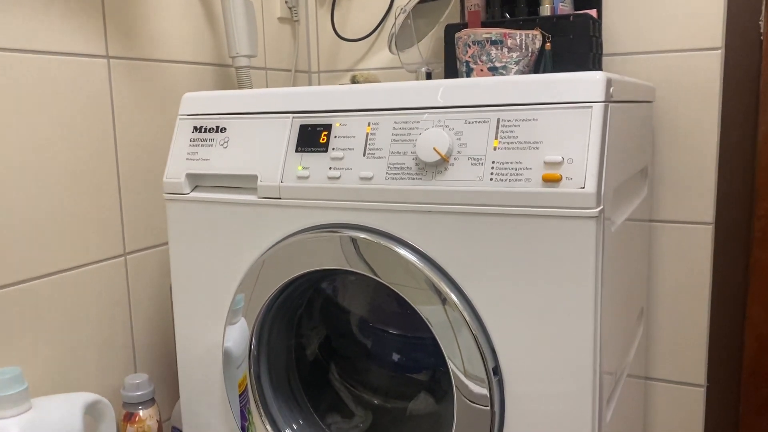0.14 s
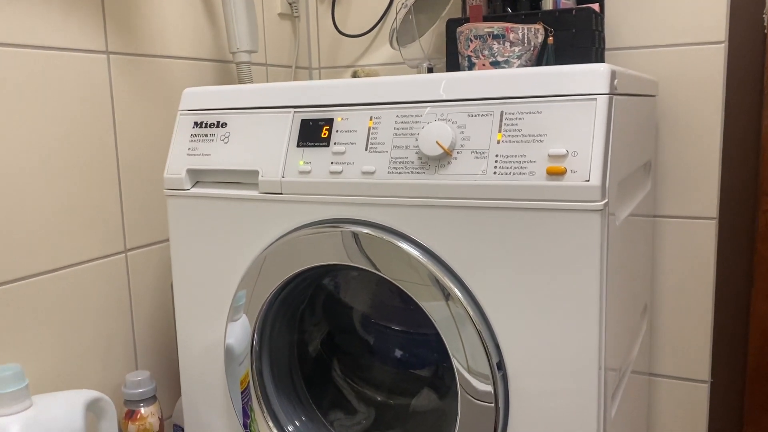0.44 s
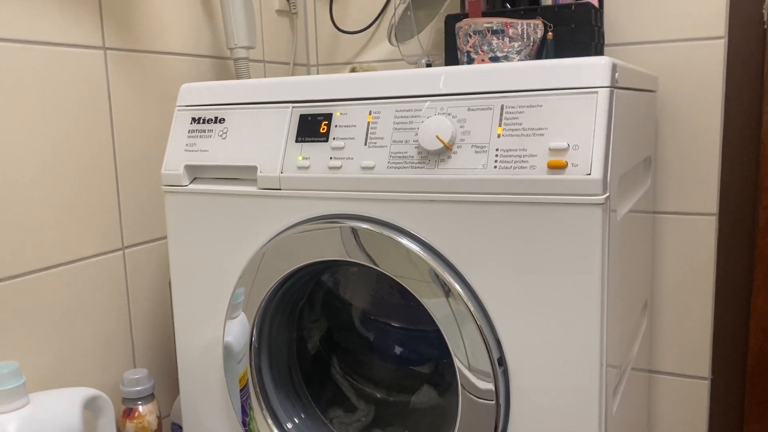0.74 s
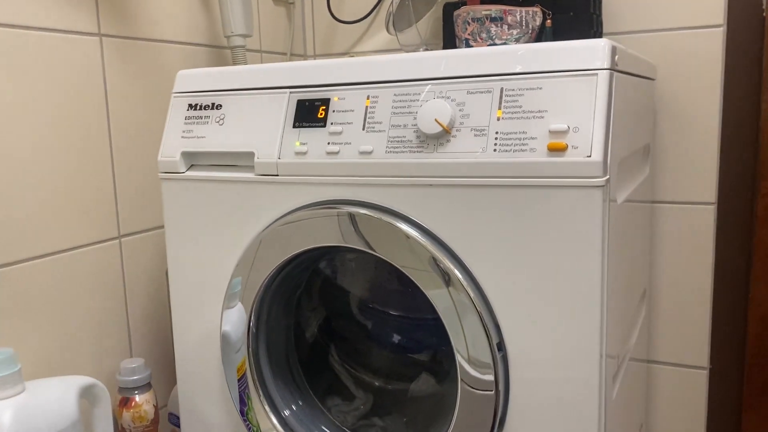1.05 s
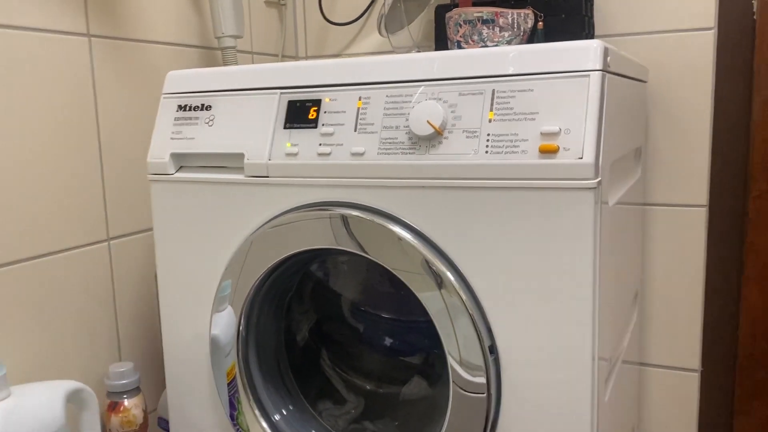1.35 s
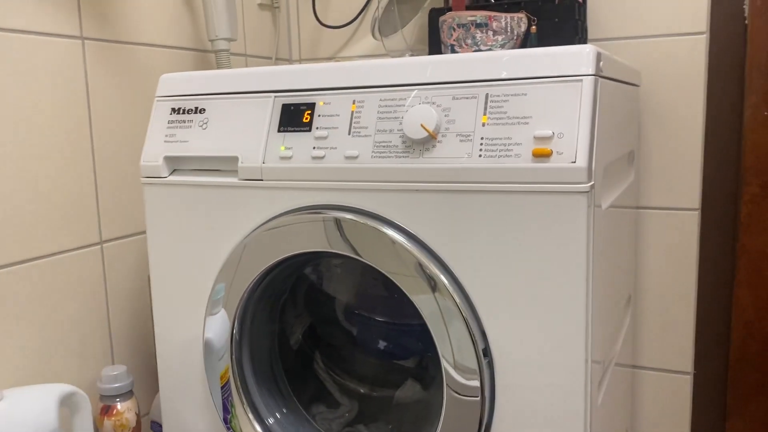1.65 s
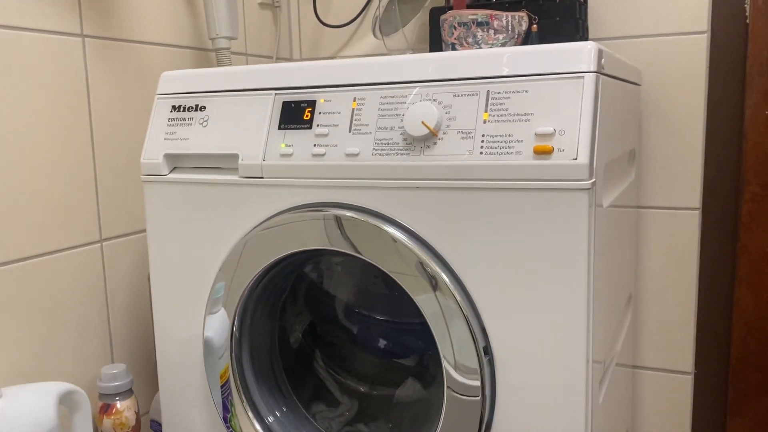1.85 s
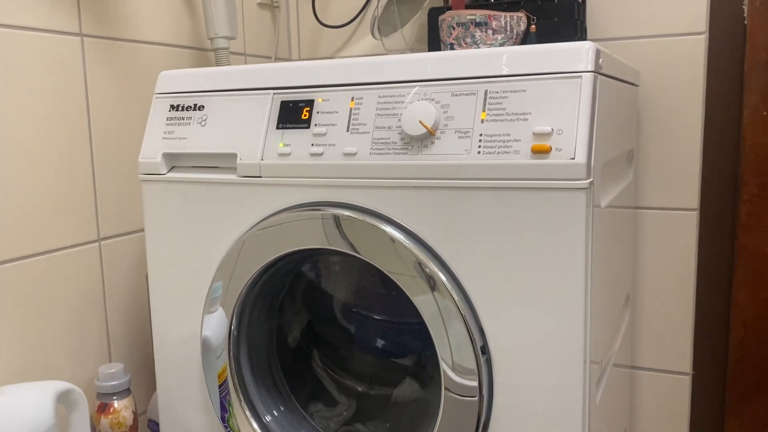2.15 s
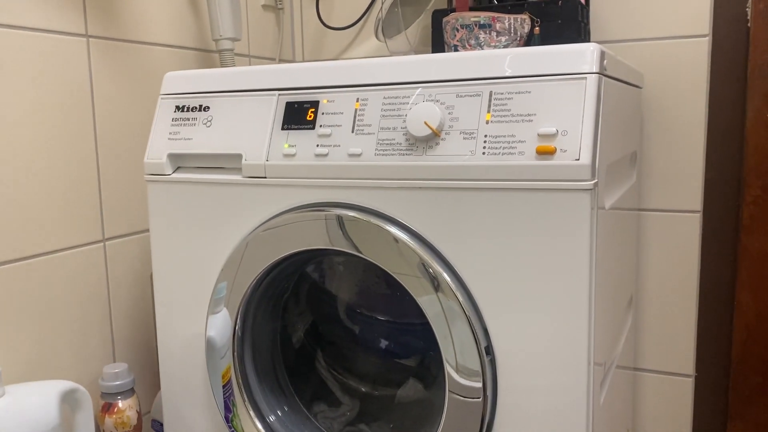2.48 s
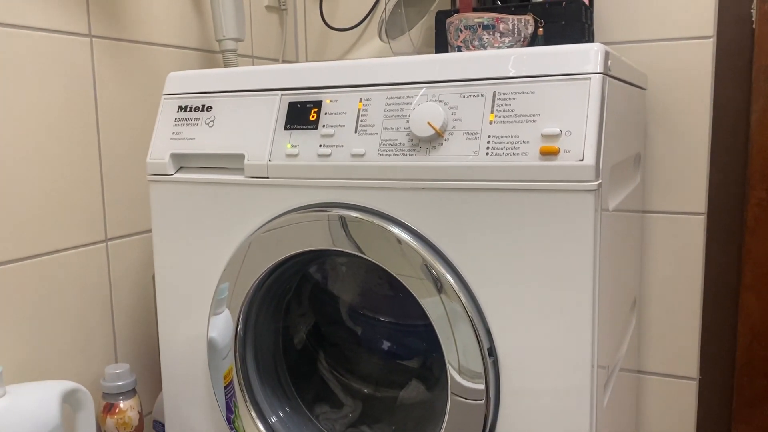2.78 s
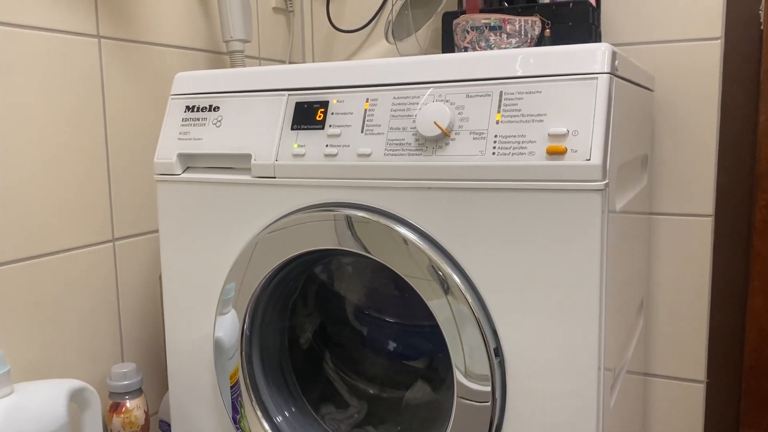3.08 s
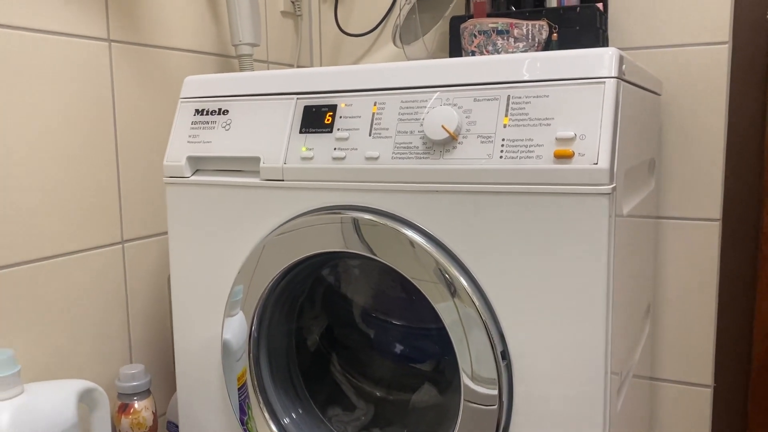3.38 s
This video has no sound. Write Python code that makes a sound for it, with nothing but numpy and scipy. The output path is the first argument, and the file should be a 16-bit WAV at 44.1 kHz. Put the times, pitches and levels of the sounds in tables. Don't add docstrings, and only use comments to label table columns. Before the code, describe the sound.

Washing machine drum turning with low thuds and watery surges, then a fuller humming roar

```python
import sys
import numpy as np
from scipy import signal
from scipy.fft import rfft, irfft
from scipy.io import wavfile
from scipy.ndimage import uniform_filter1d

SR = 44100
rng = np.random.default_rng(int(sys.argv[2]) if len(sys.argv) > 2 else 0)


def boost_factor(decibels):
    exponent = np.asarray(decibels, float) / 20
    return 10 ** exponent


def to_wav(s):
    ch = np.atleast_2d(s).T
    pcm = np.round(np.clip(ch, -1, 1) * 32767)
    wavfile.write(sys.argv[1], SR, pcm.astype(np.int16))


N = 155232
FRAME = 4096
ROAR_START_S, ROAR_RISE_S = 1.815, 0.23
ROOM = rng.standard_normal((2, 2200))


def evened(x):
    return x / np.sqrt(np.mean(abs(x) ** 2) + 1e-30)


def read(points, hz):
    f, value = np.transpose(points)
    return np.interp(np.log(hz + 1), np.log(f + 1), value)


def drift(t, top_hz):
    rates = np.geomspace(1.5, top_hz, num=16)
    return evened(sum(np.sin(2 * np.pi * (f * t + rng.random())) / np.sqrt(f) for f in rates))


def bins_and_times():
    return np.fft.rfftfreq(FRAME, 1 / SR)[:, None], np.arange(4 * N // FRAME + 5) * FRAME / 4 / SR


def sway_db(hz, t):
    # time in seconds, drift towards the wall from 0 to 1.
    sway = [
        (0, .15),
        (.55, .45),
        (1.05, .6),
        (1.4, .95),
        (2.25, .95),
        (2.6, .4),
        (2.9, .1),
        (3.52, 0),
    ]
    # frequency in Hz, left port change in dB at full drift.
    sway_left = [(60, -2), (100, -3.6), (200, -5.5), (350, -2.2), (1500, -1.5), (6000, -1.2)]
    resting_place = .55
    return read(sway_left, hz) * (np.interp(t, *np.transpose(sway)) - resting_place)


def pump(t):
    # time in seconds, rocking of the cabinet in dB, magnetic load in dB.
    states = [(0.0, -46.5, -55), (0.06, -46, -59), (0.148, -48, -63.5), (0.24, -49.5, -57),
              (0.681, -45, -65), (0.89, -44, -50), (1.25, -45, -60), (1.32, -48.5, -59.5),
              (1.55, -54, -57.5), (1.81, -44, -64), (1.989, -48, -41), (2.349, -46, -39),
              (2.67, -55.5, -42), (2.739, -51, -42), (3.1, -52.5, -40), (3.16, -63.5, -42),
              (3.401, -50, -42.5), (3.52, -53.5, -43.5)]
    # time in seconds, onset in seconds, recovery in seconds, change of rocking in dB.
    lurches = [(0.439, .03, 0.026, 3.5), (0.536, .015, 0.05, -3.5), (1.041, .03, 0.066, -3),
               (1.291, .003, 0.017, -5.5), (1.83, 0.013, .015, 3), (1.861, 0.01, 0.012, -6),
               (2.2, 0.02, 0.023, -2), (2.318, 0.042, .03, 4.5), (2.86, 0.033, .04, 5.5),
               (2.98, .02, 0.036, -8), (3.07, 0.036, 0.013, 4.5)]
    s, rock_db, load_db = np.transpose(states)
    rock_db = np.interp(t, s, rock_db)
    for at, onset, recovery, db in lurches:
        rock_db = rock_db + db * np.exp(-((t - at) / np.where(t < at, onset, recovery)) ** 2)
    return rock_db, np.interp(t, s, load_db)


def noise(gain, patchy_db):
    # resonance in Hz, lift in dB.
    panels = [(128, 5), (152, 6), (302, 8), (426, 6), (540, 3), (669, 10), (815, 15), (953, 16),
              (1057, 11.5), (1309, 14), (1604, 8), (1818, 7), (2358, 8), (3075, 6), (3170, 8), (3365, 4),
              (3620, 4), (4284, 6), (4375, 6), (4535, 5)]
    # frequency in Hz, likeness of the two ports from 0 to 1.
    likeness = [(40, .88), (100, .98), (230, .95), (400, .68), (750, .9), (1500, .55), (3500, .5),
                (6800, .65)]
    # frequency in Hz, phase lead of the left port in rad.
    left_lead = [(60, -1.2), (390, -1.5), (700, -5.1), (880, -7.1), (1400, -8.3), (2000, -12.3),
                 (3300, -13.2), (4200, -12.3)]
    # frequency in Hz, left minus right level in dB.
    tilt = [(40, -.8), (100, -1.7), (200, -3.5), (550, -5.5), (1700, -5.8), (4000, -4.2), (9000, -5)]
    port_delay_s, room_ripple_db = .000435, 2.3
    panel_hz_wide, panel_q = 6, 300

    hz, t = bins_and_times()
    f = hz[:, 0]
    a, b, c, d, patches = rng.standard_normal((gain.shape[1], len(f), 5)).T
    patches = uniform_filter1d(patches, size=FRAME // 100, axis=0)
    patches = evened(uniform_filter1d(patches, size=6, axis=1))

    ring = 1
    for panel_hz, db in panels:
        width = panel_hz_wide + panel_hz / panel_q
        ring = ring + (boost_factor(db) - 1) / (1 + (2 * (f - panel_hz) / width) ** 2)
    ripple = np.array([boost_factor(room_ripple_db * np.interp(f / 10, np.arange(len(port)), port) * (f > 250))
                       for port in ROOM])

    same = np.clip(read(likeness, hz), 0, 1)
    right = a + 1j * b
    left = same * right + np.sqrt(1 - same ** 2) * (c + 1j * d)
    lead_rad = read(left_lead, hz) + 2 * np.pi * hz * port_delay_s
    left = left * np.exp(1j * lead_rad) * boost_factor(read(tilt, hz) + sway_db(hz, t))
    z = np.array([left, right]) * gain * (ring * ripple)[:, :, None] * boost_factor(patchy_db * patches)
    return signal.istft(z, nperseg=FRAME, noverlap=FRAME * 3 // 4)[1][:, :N]


def rumble():
    # frequency in Hz, spectrum in dB per Hz.
    tub = [(25, -25), (45, -8), (65, 0), (80, -3), (95, -16), (170, -35), (400, -60)]
    # time in seconds, lift in dB, width in seconds.
    thuds = [
        (0.01, 6.5, .04),
        (.45, 8, .07),
        (.92, 14, .15),
        (1.3, 6, .08),
        (1.85, 11, .1),
        (2.42, 12, .17),
        (2.75, 13.5, .07),
        (2.98, 14.5, .11),
        (3.33, 8.5, .13),
    ]
    hz, t = bins_and_times()
    level_db = np.max([db * np.exp(-((t - at) / width) ** 2) for at, db, width in thuds], axis=0)
    return boost_factor(-60) * evened(noise(boost_factor(read(tub, hz) + level_db), patchy_db=5.5))


def cabinet():
    # frequency in Hz, idle spectrum in dB per Hz.
    idle_spectrum = [(25, -37.5), (110, -6), (440, -8.5), (650, -12), (1000, -20), (3000, -20.5),
                     (5000, -33), (8000, -49)]
    # frequency in Hz, roar spectrum in dB per Hz.
    roar_spectrum = [(25, -43.5), (120, -3), (230, -12.5), (330, -6), (700, -14), (3000, -25.5),
                     (5000, -40.5), (8000, -54.5)]
    hz, t = bins_and_times()
    top_db = -5 * np.maximum(hz - 8000, 0) / 1000
    follow_db = 0.22 * (pump(t)[0] + 47) * (hz < 900)
    idle = noise(boost_factor(read(idle_spectrum, hz) + follow_db + top_db), patchy_db=1.2)

    swell = np.clip((t - ROAR_START_S) / ROAR_RISE_S, 0, 1)
    sag_db = -0.5 * np.maximum(t - 2.67, 0)
    roar_db = -15.5 * (1 - swell) + sag_db + .6 * drift(t, 9.)
    roar = noise(boost_factor(read(roar_spectrum, hz) + roar_db + top_db), patchy_db=1.5)
    return boost_factor(-54) * evened(idle) + boost_factor(-48) * evened(roar)


def knock():
    start_s, level_db, mode_hz, t60_s = 1.2855, -41, 700, .022
    age = np.arange(N) / SR - start_s
    modes = ((.42, 1.2), (1, 1), (1.6, .6), (2.5, .35))
    ring = sum(size * np.sin(2 * np.pi * ratio * mode_hz * age) for ratio, size in modes)
    envelope = np.clip(age / .0015, 0, 1) * boost_factor(level_db - 60 * abs(age) / t60_s)
    return envelope * ring * boost_factor(np.array([[-4], [0]]))


def surges():
    # start in seconds, level in dB, rise in seconds, T60 in seconds, centre in Hz.
    gulps = [(-.03, -58.5, 0.012, 1.1, 1500), (0.237, -57.5, 0.021, 2, 2200), (.39, -50, 0.057, 0.6, 1600),
             (.53, -55.5, 0.013, 0.18, 3000), (.755, -54, 0.048, 1.6, 613),
             (.795, -51.5, 0.028, 0.56, 1100), (0.809, -55, 0.066, 1.2, 1900),
             (1.08, -58.5, 0.0099, 0.52, 2500), (1.249, -54.5, 0.017, 0.55, 1940),
             (1.272, -55, .02, .2, 1850), (1.32, -59.5, .03, 1.2, 2800), (1.468, -49, 0.023, 1.6, 1700),
             (1.471, -55.5, 0.005, 0.4, 2200), (1.757, -49.5, 0.022, 9.9, 1840),
             (1.785, -50, 0.023, 2, 950), (2.05, -47, 0.26, 2.4, 980), (2.62, -46.5, 0.19, 0.92, 1100),
             (3.058, -46.5, 0.25, 0.6, 1030)]
    width_octaves, gulp_hz, gulp_share = 0.75, 570, 0.87
    bins, t = bins_and_times()
    water = noise(1 + 0 * bins * t, patchy_db=1.2)
    hz, time, out = np.fft.rfftfreq(N, 1 / SR), np.arange(N) / SR, np.zeros((2, N))
    khz = hz / 1000
    edges = np.minimum(hz / 300, 1) * boost_factor(-8 * np.clip(khz - 3.3, 0, 2.2) - 4 * np.maximum(khz - 5.5, 0))
    throat = gulp_share * np.exp(-8 * np.log2((hz + 1) / gulp_hz) ** 2)
    shifts = rng.integers(0, N, len(gulps))
    for (start, db, rise, t60, centre_hz), shift in zip(gulps, shifts):
        rush = np.exp(-.5 * (np.log2((hz + 1) / centre_hz) / width_octaves) ** 2)
        shape = edges * (0.23 + rush + throat)
        age = time - start
        level = np.clip(age / rise, 0, 1) * boost_factor(db - 60 * np.maximum(age - rise, 0) / t60)
        out += level * evened(irfft(shape * rfft(np.roll(water, shift, axis=1)), N))
    return out


def hum():
    # multiple of the mains, level in dB, share of load followed, phase in rad,
    # right gain in dB, left lead in rad.
    orders = [(3, -63, 0.26, 0.5, 0.5, -2.2), (6, -70, 0.37, 3, -3, 0.55), (7, -66, 0.14, 2, 2.5, -1.9),
              (8, -67, .1, -4, 5, 1.66), (9, -69, 0.22, 2.1, 9, -2)]
    # phase in rad, right gain in dB, left lead in rad.
    rock_line = (.9, 2.0, -.72)
    load_line = (3.3, 4.6, -1.45)
    load_turn = (.55, -1.45)
    mains_hz, idle_db, waver_db, waver_rad = 50.01, -58, 1.2, .15

    t = np.arange(N) / SR
    slow = t[::64]
    rock_db, load_db = pump(slow)
    full = np.clip((load_db + 56) / 12, 0, 1)
    lines = []
    for k, db, (phase, right_db, lead), turn in zip((2, 4), (rock_db, load_db), (rock_line, load_line), load_turn):
        lines.append((k, db, phase + turn * full, right_db, lead, .8))
    for k, db, share, phase, right_db, lead in orders:
        lines.append((k, db + share * (load_db - idle_db), phase, right_db, lead, 3.1))

    out = np.zeros((2, N))
    for k, db, phase, right_db, lead, loose in lines:
        size = np.interp(t, slow, boost_factor(db + loose * waver_db * drift(slow, 14.)))
        wander = np.interp(t, slow, phase + loose * waver_rad * drift(slow, 11.0))
        angle = 2 * np.pi * k * mains_hz * t + wander
        left = boost_factor(sway_db(k * mains_hz, t)) * np.cos(angle)
        right = boost_factor(right_db) * np.cos(angle - lead)
        out += np.sqrt(2) * size * np.array([left, right])
    return out


def scene():
    return rumble() + cabinet() + knock() + surges() + hum()


def band_limit(x):
    return signal.sosfilt(signal.butter(12, 12260, fs=SR, output="sos"), x)


def record(dry):
    # frequency in Hz, microphone response in dB.
    mic = [(3300, 0), (4300, 1.5), (5200, 1.5), (6500, 3), (7700, 0), (9000, -7), (10000, -3.5),
           (11000, -4.5)]
    hz, t = np.fft.rfftfreq(N, 1 / SR), np.arange(N) / SR
    dry = irfft(boost_factor(read(mic, hz)) * rfft(dry), N)

    step = (hz > 8000) * boost_factor(-19 * np.maximum(hz - 8280, 0) / 1000)
    swell = boost_factor(1.0 * np.clip((t - ROAR_START_S) / ROAR_RISE_S, 0, 1) + .8 * drift(t, 12.))
    hiss = swell * evened(irfft(step * rfft(rng.standard_normal(N)), N)) * np.array([[0], [1]])
    image = boost_factor(-70.5) * dry * 2 * np.cos(2 * np.pi * 12000 * t)
    fade = np.minimum(np.arange(N)[::-1] / 90, 1)
    return band_limit(fade * (dry + boost_factor(-82) * hiss + image))


dry = scene()
out = record(dry)
to_wav(out)
```